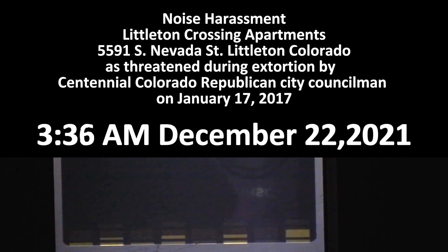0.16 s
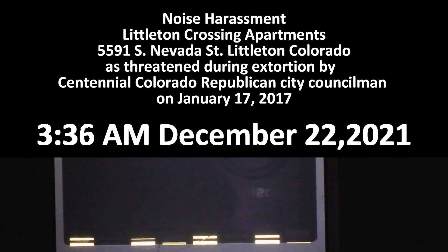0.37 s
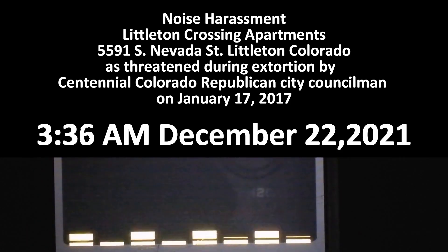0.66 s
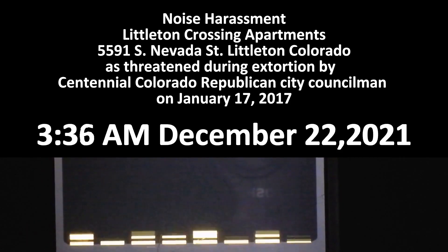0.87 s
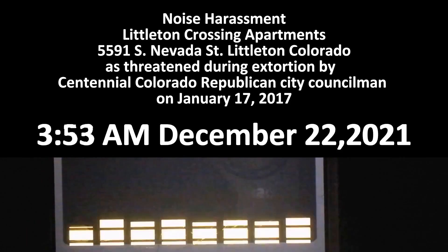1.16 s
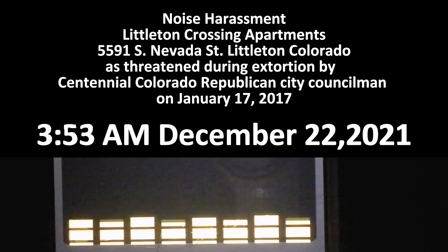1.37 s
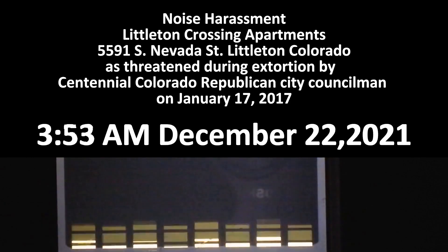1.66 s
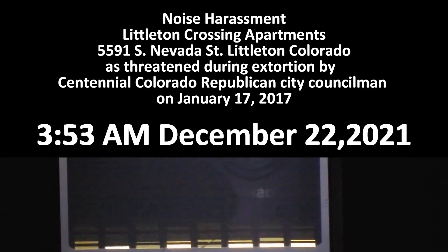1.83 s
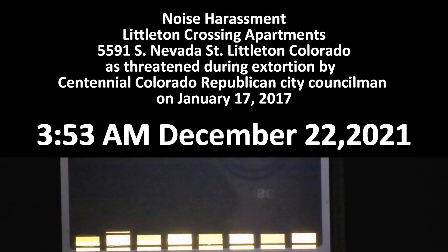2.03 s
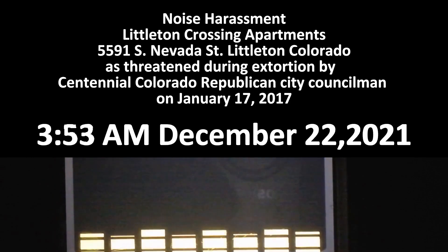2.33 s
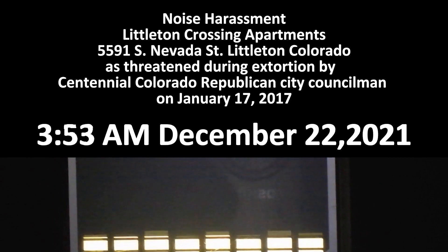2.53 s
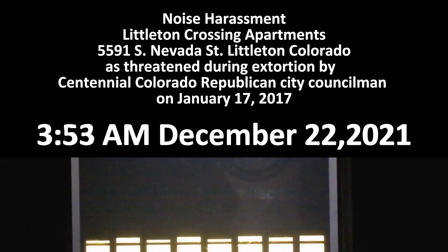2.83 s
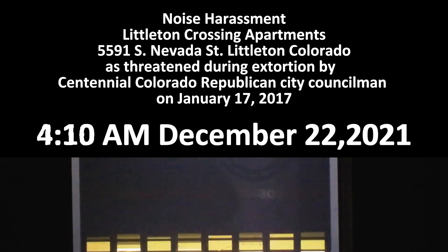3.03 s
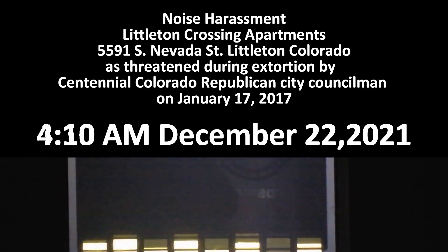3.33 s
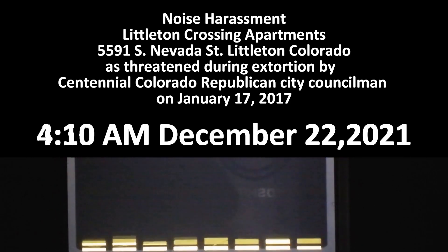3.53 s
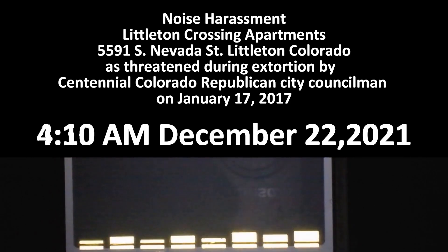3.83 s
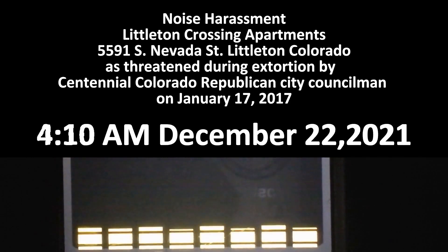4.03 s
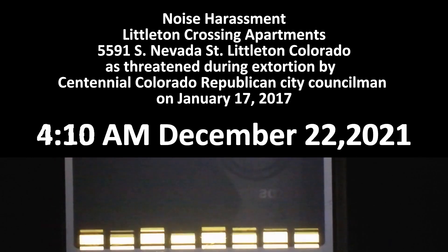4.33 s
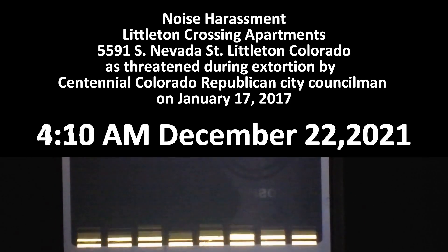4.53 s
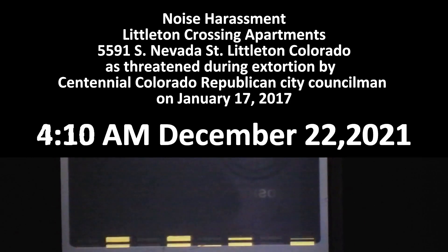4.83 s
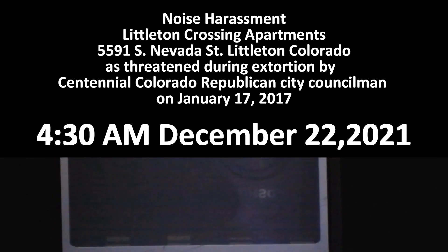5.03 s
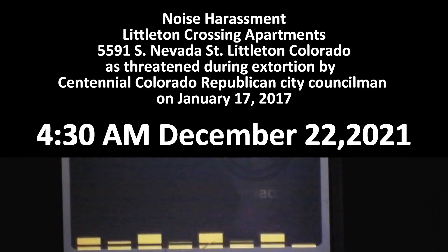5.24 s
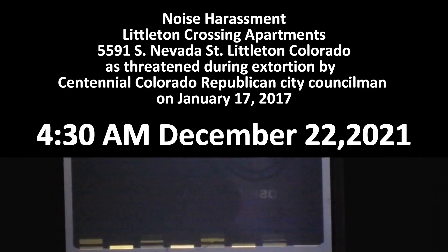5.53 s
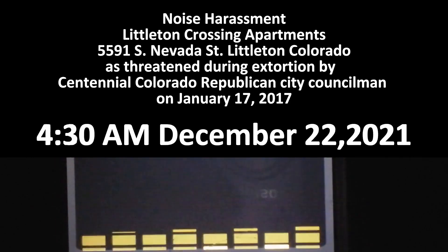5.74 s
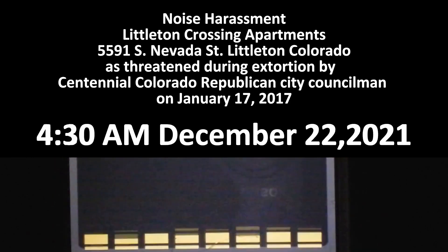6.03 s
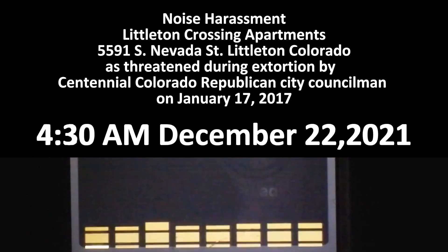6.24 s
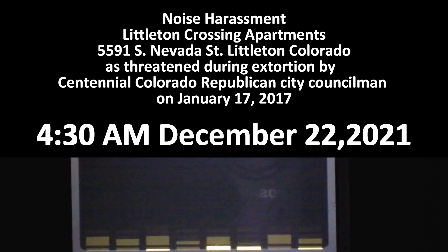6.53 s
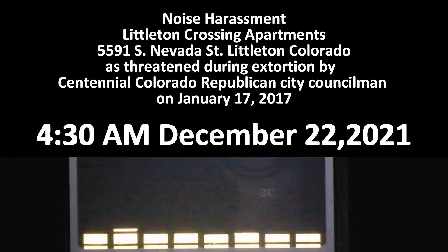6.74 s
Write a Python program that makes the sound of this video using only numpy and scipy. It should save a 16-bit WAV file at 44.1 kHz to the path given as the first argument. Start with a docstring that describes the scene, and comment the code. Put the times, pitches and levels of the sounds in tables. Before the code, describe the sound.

A loud low electrical hum throbs steadily through apartment walls, then the compressor shudders off with dull knocks, leaving a quieter hum and airy rumble.

```python
"""An apartment, with a compressor droning through the walls. It and a weaker motor turn just under the
mains rate, so their sines beat with the mains hum and the drone throbs.
The compressor cuts out with a dull shudder: ringing knocks, panel noise and a low rocking tone.
The motor, a fan, thin whines and a weaker mains hum carry on over filtered-noise rumble and air.
One tiny high tick is heard near the start."""
import sys
import numpy as np
from scipy.fft import rfft, irfft, next_fast_len
from scipy.io import wavfile
from scipy.ndimage import map_coordinates

SR = 44100
rng = np.random.default_rng(int(sys.argv[2]) if len(sys.argv) > 2 else 0)


def master_out(mix):
    """Clip the mix to full scale and print it as 16-bit PCM to the path in sys.argv[1]."""
    frames = np.transpose(np.atleast_2d(mix))
    ceiling = np.clip(frames, -1, 1)
    pcm = np.round(ceiling * 32767).astype(np.int16)
    wavfile.write(sys.argv[1], SR, pcm)


N = 303849

SHAFT_HZ, MOTOR_HZ, MAINS_HZ, FAN_HZ = 59.26, 59.55, 60, 84.7
CUT_OUT_S = 5.205  # the compressor loses power
# moments when two rates are in phase
SHAFT_MAINS_IN_STEP_S, MOTOR_MAINS_IN_STEP_S = 0.636, 0.53
SHAFTS_IN_STEP_S, OVERTONES_IN_STEP_S = 1.47, 0.83


def amp(db):
    """Decibels to gain."""
    return 10 ** (np.asarray(db) / 20)


def unit(x):
    """Scale to rms 1."""
    return x / np.sqrt(np.mean(x ** 2) + 1e-20)


def clock():
    """Time of each sample in seconds."""
    return np.arange(N) / SR


def wobble(rate_hz):
    """A smooth random curve with rate_hz knots a second."""
    knots = rng.standard_normal(int(N * rate_hz / SR) + 4)
    return map_coordinates(knots, [clock() * rate_hz], mode="nearest")


def filtered(x, response):
    """Multiply the spectrum of x by a response of frequency in Hz."""
    size = next_fast_len(N + SR // 2)
    spectrum = rfft(x, size) * response(np.fft.rfftfreq(size, 1 / SR))
    return irfft(spectrum, size)[:N]


def noise(points):
    """Noise of rms 1 shaped by (Hz, dB) points, joined over log frequency."""
    point_hz, db = np.transpose(points)
    white = rng.standard_normal(N)
    return unit(filtered(white, lambda hz: amp(np.interp(np.log(hz + 1), np.log(point_hz), db))))


def sine(turns):
    """A sine of rms 1 from its phase in turns."""
    return np.sqrt(2) * np.sin(2 * np.pi * turns)


def tone(hz, waver_db, drift_turns, rate_hz):
    """A sine that wavers in level and drifts in phase."""
    level = amp(waver_db * wobble(rate_hz))
    return level * sine(hz * clock() + rng.random() + drift_turns * wobble(rate_hz))


# Compressor overtones. Each row: multiple of the shaft rate, level in dB.
STROKE_ORDERS = [(3, -38), (4, -34.5)]
# Mains overtones of the powered compressor. Each row: multiple of the mains rate, level in dB.
BUZZ_ORDERS = [(4, -40), (6, -50.5)]


def compressor(shaft_db=-19.5, beat_db=-28.5, coast_s=0.073, slowing_per_s=2.28):
    """Slipping rotor orders beat with the mains; at the stop the second order swells and sinks in pitch."""
    judder_db, judder_s = -13.5, 0.21
    t = clock()
    unpowered = np.maximum(t - CUT_OUT_S, 0)
    running = np.exp(-(unpowered / coast_s) ** 2)
    spun = t - slowing_per_s * unpowered ** 2 / 2  # friction brakes the free rotor
    second = sine(2 * (SHAFT_HZ * (spun - SHAFT_MAINS_IN_STEP_S) + MAINS_HZ * SHAFT_MAINS_IN_STEP_S))
    shaft = amp(shaft_db) * sine(SHAFT_HZ * (spun - SHAFTS_IN_STEP_S)) + amp(beat_db) * second
    strokes = sum(amp(db + 2.2 * wobble(3)) * sine(order * SHAFT_HZ * (spun - OVERTONES_IN_STEP_S))
                  for order, db in STROKE_ORDERS)
    buzz = sum(amp(db) * sine(order * MAINS_HZ * (t - OVERTONES_IN_STEP_S))
               for order, db in BUZZ_ORDERS)
    judder_swell = np.sin(np.pi * np.minimum(unpowered / judder_s, 1))
    return running * (shaft + strokes + buzz) + amp(judder_db) * judder_swell * second


def mains_hum(on_db=-15, off_db=-23, drop_at_s=5.31, drop_s=0.023):
    """Magnetic hum at twice the mains rate; most of it goes as the compressor stops."""
    t = clock()
    powered = (1 - np.tanh((t - drop_at_s) / drop_s)) / 2
    level = amp(on_db) * powered + amp(off_db) * (1 - powered)
    return level * sine(2 * MAINS_HZ * t)


# Dull rattle of loose panels. Each row: frequency in Hz, relative level in dB per Hz.
PANEL_SPECTRUM = [(35, -24.5), (60, 0), (100, -1.5), (135, 1.5), (165, -4.5), (195, -0.5), (275, -10),
                  (340, -36), (700, -120)]


def panels(start_s=5.17, rise_s=0.04, hold_s=0.089, level_db=-20, fall_db_per_s=32):
    """The stop shakes loose panels: low noise that rises, holds and dies away."""
    t = clock()
    rise = np.clip((t - start_s) / rise_s, 0, 1)
    dying = np.maximum(t - start_s - rise_s - hold_s, 0)
    return rise * amp(level_db - fall_db_per_s * dying) * noise(PANEL_SPECTRUM)


# Compressor against its mounts. Each row: start in seconds, level in dB, contact time in seconds.
MOUNT_KNOCKS = [(5.204, -11.5, 0.0031), (5.2414, -15.5, 0.0021), (5.2704, -14, .0015),
                (5.298, -15.5, 0.0036), (5.355, -22.5, 0.0027), (5.432, -18, 0.0017)]
# Floor and wall modes. Each row: frequency in Hz, mean level in dB, 60 dB decay time in seconds.
STRUCTURE_MODES = [(69, -10.5, .22), (111.3, -3, 0.22), (136, -5, 0.18), (184.9, -4, 0.4),
                   (220.4, -5, 0.22), (274, -15, .16)]


def knocks():
    """Soft mount contacts ring decaying modes in floor and wall; longer contact softens the onset."""
    out = np.zeros(N)
    for start_s, db, contact_s in MOUNT_KNOCKS:
        age = np.maximum(clock() - start_s, 0)
        ring = np.zeros(N)
        for hz, mode_db, t60_s in STRUCTURE_MODES:
            decay = amp(mode_db + rng.normal(0, 1.4) - 60 * age / t60_s)
            ring += decay * np.sin(2 * np.pi * hz * age)
        out += amp(db) * ring * (1 - np.exp(-(age / contact_s) ** 2))
    return out


# Compressor on its springs. Each row: middle in seconds, length in seconds, level in dB.
SPRING_LURCHES = [(5.56, 0.4, -21), (5.8, 0.085, -27)]


def rocking(rock_hz=86.5):
    """The compressor lurches on its springs: half-cosine swells of a wavering low tone."""
    sway = sum(amp(db) * np.cos(np.pi * np.clip((clock() - middle_s) / length_s, -.5, .5))
               for middle_s, length_s, db in SPRING_LURCHES)
    return sway * tone(rock_hz, waver_db=3.5, drift_turns=0.051, rate_hz=18)


def motor(shaft_db=-31.5, beat_db=-34.0, third_db=-37):
    """A second motor runs throughout, beating slowly with the compressor shaft and faster with the hum."""
    t = clock()
    turns = MOTOR_HZ * (t - MOTOR_MAINS_IN_STEP_S) + MAINS_HZ * MOTOR_MAINS_IN_STEP_S
    first = amp(shaft_db) * sine(MOTOR_HZ * (t - SHAFTS_IN_STEP_S))
    second = amp(beat_db) * sine(2 * turns)
    third = amp(third_db) * tone(3 * MOTOR_HZ, waver_db=2.0, drift_turns=0.13, rate_hz=4)
    return first + second + third


# Fan orders. Each row: multiple of the fan rate, level in dB.
FAN_ORDERS = [(1, -32.5), (2, -34.5)]


def fan():
    """Low multiples of the fan rate, wavering slowly."""
    return sum(amp(db) * tone(order * FAN_HZ, waver_db=1.5, drift_turns=0.031, rate_hz=2.5)
               for order, db in FAN_ORDERS)


# Machinery that keeps running. Each row: frequency in Hz, level in dB.
WHINE_TONES = [(189.7, -44), (252.1, -40.5), (361.4, -44), (399, -45), (581.7, -54), (756.4, -56.5),
               (1008.5, -60), (2090, -68.5), (2955, -75)]


def whine():
    """Thin tones of the running machinery, wavering in level and phase."""
    return sum(amp(db) * tone(hz, waver_db=2.0, drift_turns=.12, rate_hz=4) for hz, db in WHINE_TONES)


# Rumble through the building. Each row: frequency in Hz, relative level in dB per Hz.
RUMBLE_SPECTRUM = [(12, -10.5), (25, -4.5), (40, -6), (56, 2.5), (75, -1.5), (110, 1.5), (150, 1.5),
                   (190, -1), (240, -5.5), (290, -7), (380, -20.5), (900, -120)]


def rumble(level_db=-25.0):
    """Turbulence rumbles in the building: low noise of unsteady level."""
    return amp(level_db) * noise(RUMBLE_SPECTRUM) * amp(0.58 * wobble(8.2))


# Moving air. Each row: frequency in Hz, relative level in dB per Hz.
AIR_SPECTRUM = [(150, -24.5), (300, -2), (450, 1), (520, -4), (640, -8.5), (850, -13), (1200, -17),
                (1700, -19.5), (2070, -20.5), (2200, -24), (3050, -27), (3750, -32), (4500, -43),
                (7000, -64.5)]
# Duct resonances. Each row: frequency in Hz, width in Hz, lift over the rush in dB.
DUCT_RESONANCES = [(362, 18, 2.5), (399, 29, 5.5), (447, 40, 5), (531, 21, 5.5), (600, 22, 2.5),
                   (672, 13, 2.5), (810, 25, 2.5), (1076, 37, 3), (1353, 32, 3.5), (1570, 28, 1.5),
                   (1910, 35, 3.5), (2076, 22, 4), (3000, 52, 2)]


def air(level_db=-32.0, ripple_db=2.0, ripple_hz=7):
    """Turbulence rushes into the room, lifted at the duct resonances."""
    # many standing waves leave a fine fixed ripple over frequency
    standing = rng.standard_normal(SR // 4)

    def response(f):
        duct_db = sum(lift_db / (1 + (2 * (f - hz) / width_hz) ** 2)
                      for hz, width_hz, lift_db in DUCT_RESONANCES)
        room_db = ripple_db * np.interp(f / ripple_hz, np.arange(len(standing)), standing)
        return amp(duct_db + room_db)

    return amp(level_db) * unit(filtered(noise(AIR_SPECTRUM), response))


# Strongest duct note. Each row: frequency in Hz, relative level in dB per Hz.
DUCT_NOTE_SPECTRUM = [(250, -90), (380, -25), (425, -8.5), (451, -0.5), (476, -6.5), (520, -30),
                      (900, -120)]


def duct_note(level_db=-36.0, swell_db=1.0, swell_hz=3.07, swell_at_s=.85):
    """A narrow band of noise in the duct, swelling about three times a second."""
    swell = np.cos(2 * np.pi * swell_hz * (clock() - swell_at_s))
    return amp(level_db + swell_db * swell) * noise(DUCT_NOTE_SPECTRUM)


# Tiny tick in the room. Each row: start in seconds, peak level in dB, pitch in Hz.
TICK_EVENTS = [(0.342, -48, 7200)]


def ticks(t60_s=0.017):
    """A short, high, decaying ring."""
    out = np.zeros(N)
    for start_s, db, hz in TICK_EVENTS:
        age = np.maximum(clock() - start_s, 0)
        out += amp(db - 60 * age / t60_s) * np.sin(2 * np.pi * hz * age)
    return out


def scene():
    """All sources as heard in the room."""
    drone = compressor() + mains_hum()
    shudder = panels() + knocks() + rocking()
    still_running = motor() + fan() + whine()
    airflow = rumble() + air() + duct_note()
    return (drone + shudder + still_running + airflow + ticks())[None]


# Microphone hiss. Each row: frequency in Hz, relative level in dB per Hz.
HISS_SPECTRUM = [(1000, 1), (5000, 3.5), (7000, -2.5), (11000, -2), (14500, 1.5), (15500, 4)]


def record(dry, hiss_db=-59.0, top_hz=15720):
    """The microphone adds faint hiss and keeps nothing above its band limit."""
    hissy = dry[0] + amp(hiss_db) * noise(HISS_SPECTRUM)
    return filtered(hissy, lambda hz: hz < top_hz)[None]


dry = scene()
out = record(dry)
master_out(out)
```